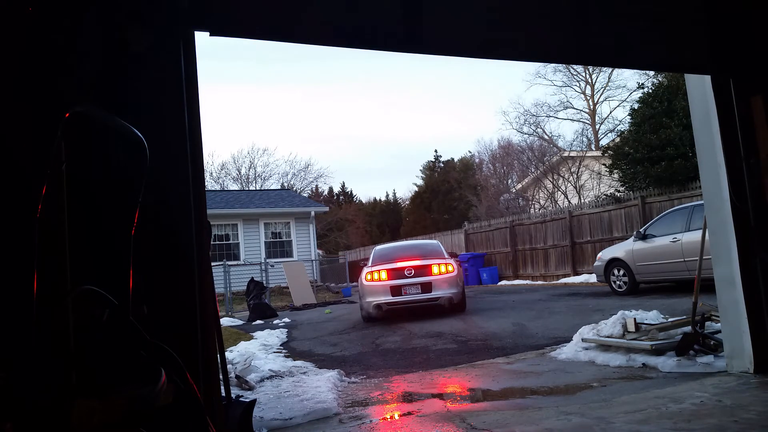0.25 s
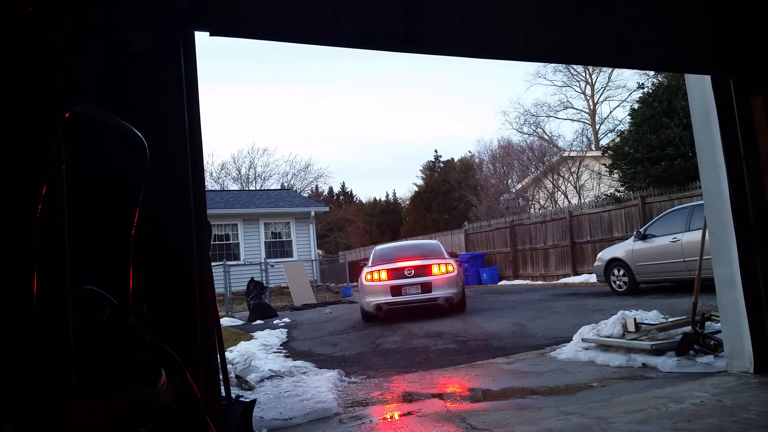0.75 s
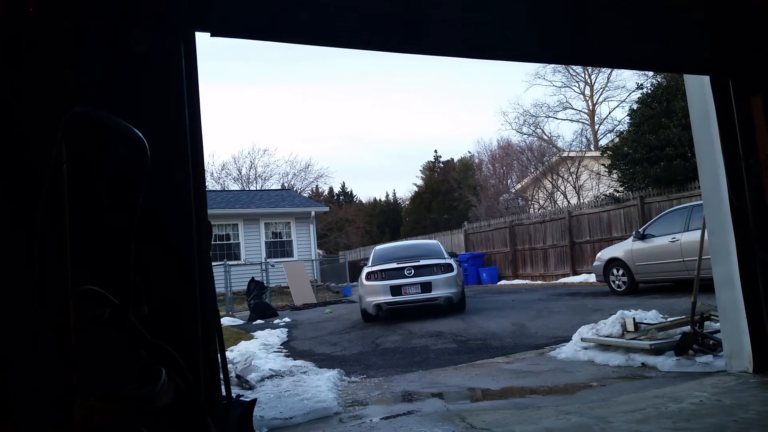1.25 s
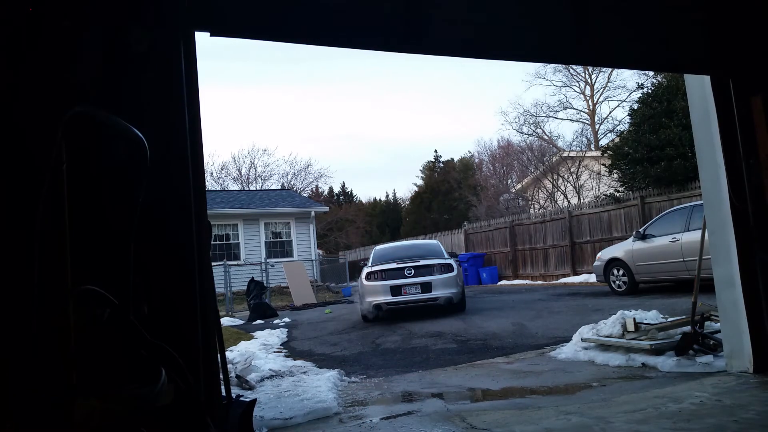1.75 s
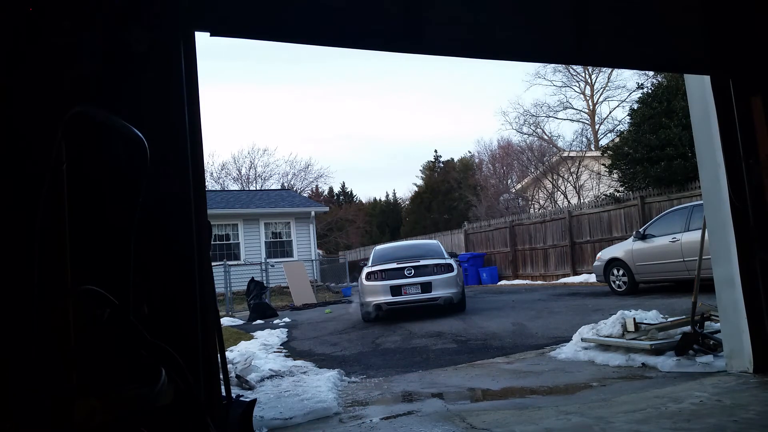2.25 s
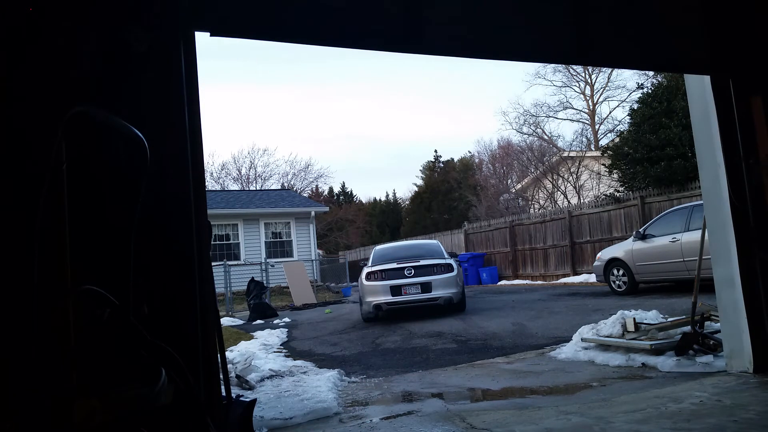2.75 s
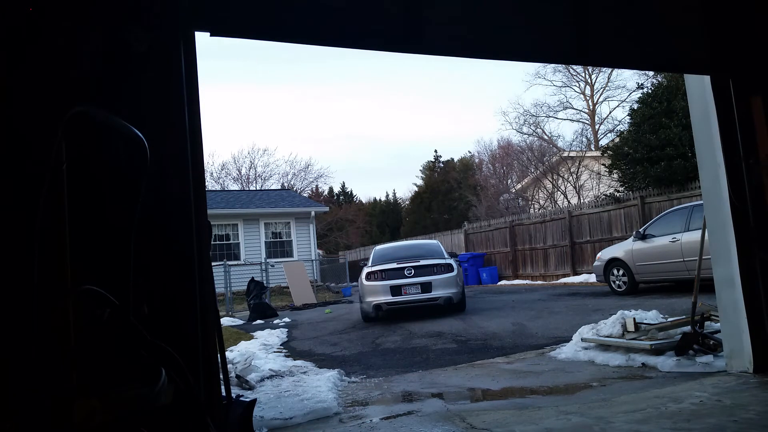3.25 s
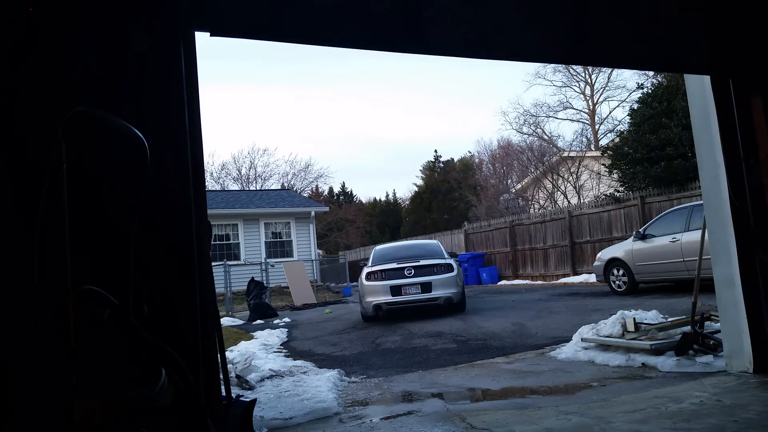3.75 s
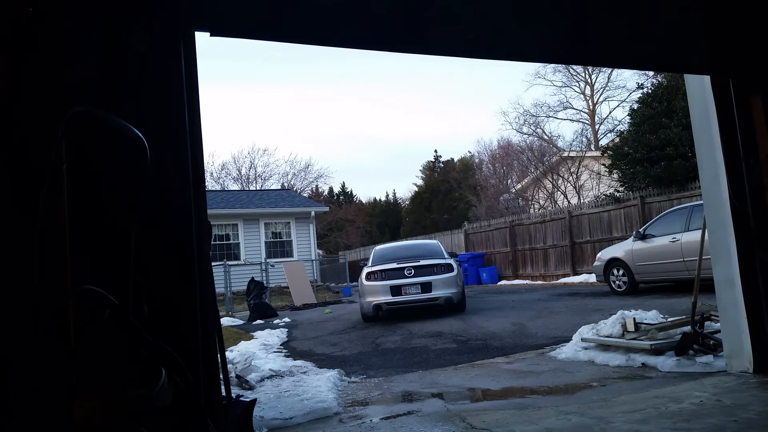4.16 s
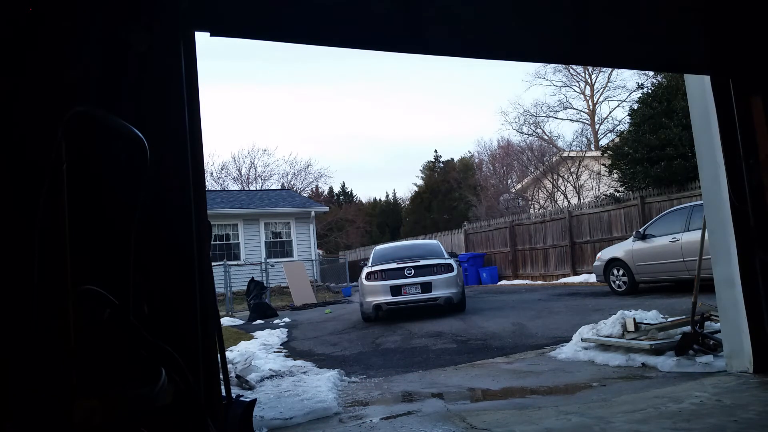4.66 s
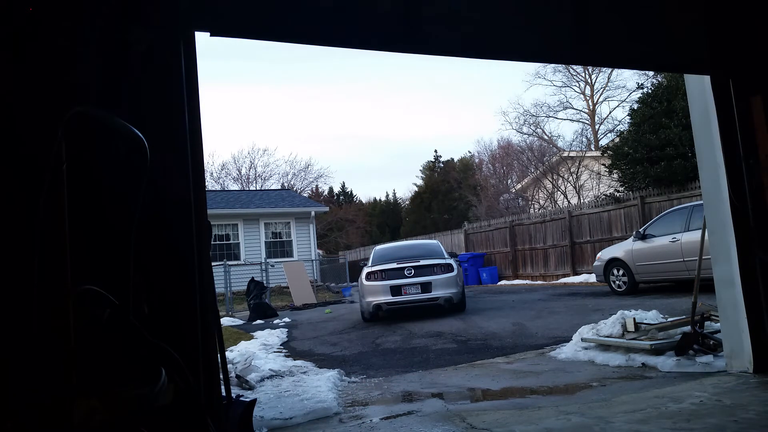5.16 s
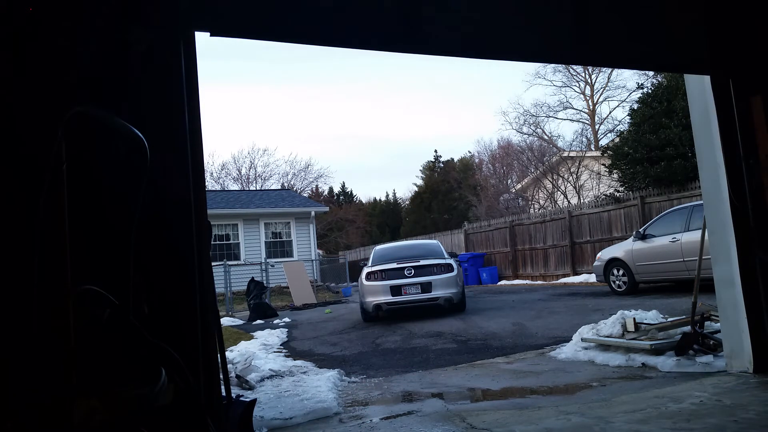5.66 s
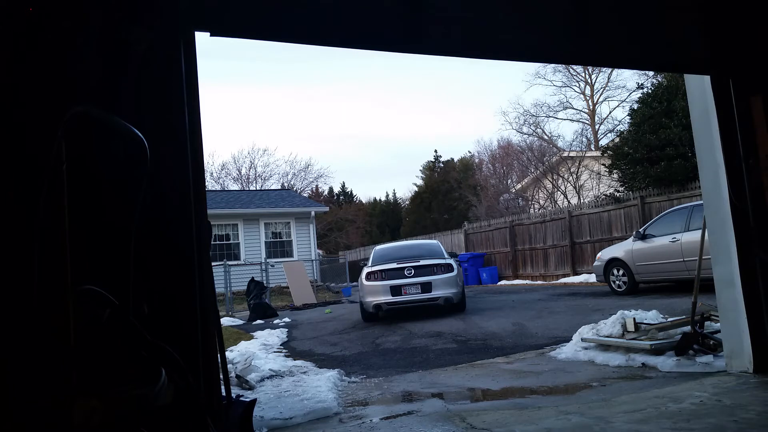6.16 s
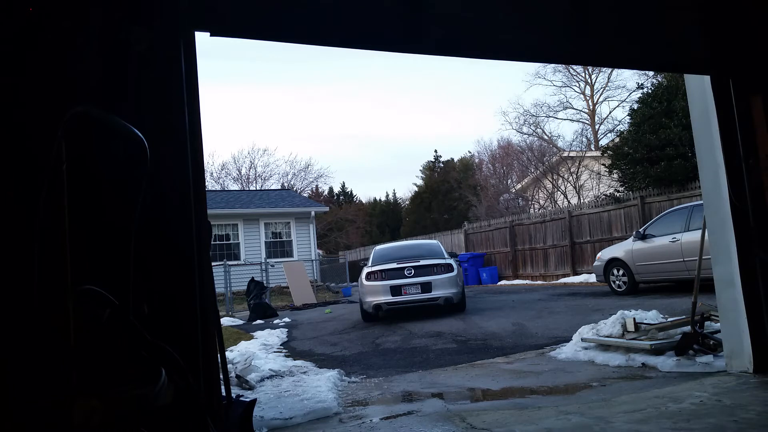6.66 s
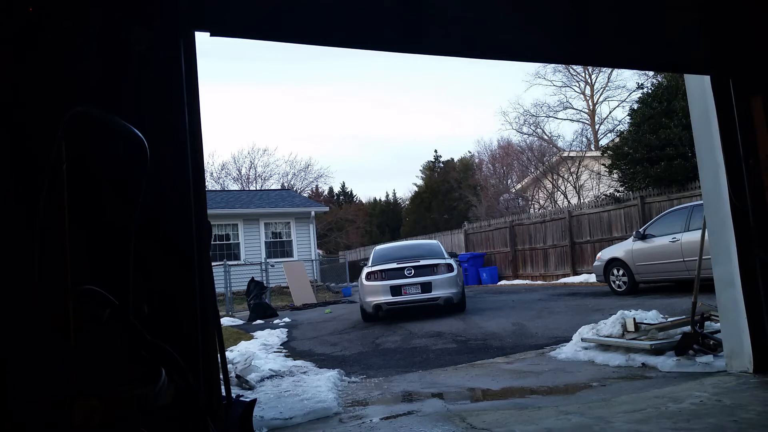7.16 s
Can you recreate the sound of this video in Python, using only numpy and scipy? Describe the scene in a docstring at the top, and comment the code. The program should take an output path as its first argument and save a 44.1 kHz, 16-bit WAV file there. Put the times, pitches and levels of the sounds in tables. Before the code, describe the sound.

A V8 car with a loud exhaust is already running in a driveway, heard from inside an open garage. From the start it labours at a raised idle, climbing slightly in pitch and swelling into a deep, booming drone that is loudest around 2 seconds. A wavering hum and a gassy rasp ride on it early. Between about 2.2 and 2.6 seconds the engine speed drops and it settles into a somewhat quieter, lumpy lope. This rumble continues until the end at about 7.4 seconds, with uneven chugs, small surges around 5 to 6 seconds and brief ragged barks near 6 and 7 seconds. The low pulses make the garage ring, and the tailpipes give a few soft spits. Underneath are faint engine ticking, scattered metallic clicks, most noticeable around 2 to 3 seconds, a light hiss and a barely audible pump whine.

```python
"""A driveway, heard from inside an open garage: a V8 with a loud exhaust is running.
It labours at a raised, booming idle, then drops to a lumpy lope after about two seconds.
Each firing thumps the tailpipes and puffs gas, ringing the pipes and the garage.
The engine ticks, clicks and hisses, and a pump whines faintly."""
import sys
import numpy as np
from scipy import signal
from scipy.fft import rfft, irfft
from scipy.io import wavfile
from scipy.ndimage import uniform_filter1d, minimum_filter1d

SR = 44100
rng = np.random.default_rng(int(sys.argv[2]) if len(sys.argv) > 2 else 0)


def to_wav(sig):
    """Store sig (one row per channel, or 1-D mono) as 16-bit WAV at the path in sys.argv[1].

    Samples outside -1..1 are clipped; the rate is SR.
    """
    pcm = np.clip(np.atleast_2d(sig), -1, 1) * 32767
    pcm = np.round(pcm).astype(np.int16)
    wavfile.write(sys.argv[1], SR, pcm.T)  # frames by channels


N = 326781
TIME = np.arange(N) / SR


# Engine speed. Each row: time in seconds, firings per second.
FIRING_RATE_HZ = [(0.0, 85.78), (0.58, 93.43), (1.55, 97.93), (2.18, 95.26), (2.6, 82.92), (3.15, 82.23),
                  (3.75, 84.04), (4.5, 84.25), (5.85, 83.38), (6.7, 85.03), (7.41, 85.22)]

def crankshaft(start_firings=.19):
    """Crank position, counted in firings."""
    return start_firings + np.cumsum(curve(FIRING_RATE_HZ)) / SR


# Cylinder strengths in firing order. Each row: gain pulling in dB, gain idling in dB.
CYLINDER_DB = [(7, -14), (2.4, 4.8), (0.5, 0.4), (-15, 4.6), (-1.4, 7), (0.9, 7.3), (3.1, -2.6), (1.2, 2.8)]
# Engine load. Each row: time in seconds, idling share 0-1, unevenness of the burns 0-1.
ENGINE_LOAD = [(0, 0.6, 0.12), (.35, 0.35, 0.13), (.6, 0.04, 0.22), (1.5, 0.03, .18), (2.15, 0.06, 0.22),
               (2.5, 1, 0.16), (3.4, 1, 0.16), (3.8, 1, 0.115)]

def firings(crank, carry=0.86, jitter_s=0.00035):
    """Sample and size of each pulse. Residual gas makes a cylinder's weak burn follow its strong one."""
    at = crossings(crank)
    cylinder = np.floor(crank[at]).astype(int) % len(CYLINDER_DB)
    pulling_db, idling_db = np.transpose(CYLINDER_DB)[:, cylinder]
    idling, uneven = curve(ENGINE_LOAD)[at], curve(ENGINE_LOAD, column=2)[at]
    burn, late = rng.standard_normal((len(at), 2)).T
    cycle_feedback = np.r_[1, np.zeros(len(CYLINDER_DB) - 1), carry]
    strength = 1 + np.tanh(uneven * signal.lfilter([1], cycle_feedback, burn))
    sizes = strength * gain_of((1 - idling) * pulling_db + idling * idling_db)
    return shifted(at, late * jitter_s), sizes


# Pipe response to one pulse. Each row: frequency in Hz, gain in dB.
PIPE_SPECTRUM = [(20, -38), (42, -21), (51, -23), (59, 4.5), (66, -9), (74, -9), (79, -14), (84, -6.8),
                 (89, -9.5), (96, 2.5), (101, 4), (107, 10), (111, 6.5), (116, 0), (126, 5.5), (134, -3.5),
                 (143, -2.5), (150, -12), (161, -11), (168, -24), (179, -17), (200, -35), (400, -60)]
# Boom level. Each row: time in seconds, level in dB.
BOOM_DB = [(0, -21.5), (.2, -17.5), (.65, -12.5), (1.2, -10), (2.13, -8.5), (2.3, -11.5), (2.52, -21.5),
           (2.8, -15.5), (3.1, -15.5), (3.85, -20), (7.4, -21.5)]
# Surges of harder burns as the idle hunts. Each row: centre in seconds, boom swell in dB.
IDLE_SURGES = [(2.79, 2.5), (3.46, 2), (4.06, 1.6), (4.33, 1.5), (4.55, 2), (4.92, 4), (5.3, 5.5),
               (5.64, 3.5), (5.87, 4), (6.24, 1.7), (7.03, 2), (7.28, 3.5)]
# Gaps and chugs from single weak or strong burns. Each row: centre in seconds, boom change in dB.
BURN_LURCHES = [(.3, -7), (2.26, -8), (2.53, 5.5), (2.7, -2), (2.9, -3.5), (2.99, 1), (3.07, 4), (3.1, -5),
                (3.28, -5), (3.58, 2), (3.81, -3.5), (4.19, -4.5), (4.39, -2.5), (4.77, -7), (4.88, 1),
                (5.01, 3), (5.15, -4.5), (5.34, -7.5), (5.56, 1), (5.75, -3), (6.25, 4), (6.61, -4.5),
                (6.77, -2.5), (6.86, -1.5), (7.34, -3)]

def boom(pulses):
    """The pulses ring the low resonances of pipes and mufflers."""
    pipes = steady(lowpass(colour(pulses, PIPE_SPECTRUM), hz=617), window=4200)
    level_db = curve(BOOM_DB) + swells(IDLE_SURGES) + swells(BURN_LURCHES, sigma_s=.015)
    return garage(pipes, wet_db=-22, t60_s=.3) * gain_of(level_db) * pan(left_db=-1.3)


# Blat spectrum. Each row: frequency in Hz, gain in dB.
BLAT_SPECTRUM = [(60, -42), (150, -1), (165, 0), (180, -5), (197, -7), (216, -8), (232, 1), (250, -1),
                 (272, 2), (295, -0.5), (312, 3), (345, 3.5), (368, -10), (400, -10.5), (438, -25),
                 (480, -21.5), (590, -22), (660, -30), (900, -55), (3000, -100)]
# Blat level. Each row: time in seconds, level in dB.
BLAT_DB = [(0, -37), (.35, -34), (1.0, -35), (2.3, -35.5), (2.6, -37.5), (7.4, -38.5)]
# Garage ringing. Each row: time in seconds, level relative to the direct blat in dB.
RINGING_DB = [(0, -7), (.5, -8), (1.0, 0), (2.3, 0), (3.0, 6)]
# Ragged burns barking in the pipes. Each row: centre in seconds, blat swell in dB, rasp swell in dB.
PIPE_BARKS = [(.02, 6, 1), (.3, 3.5, 0), (.49, 4.5, 0.5), (1.17, 4, -0.5), (2.22, 0.5, -1), (5.1, 0.5, -1),
              (6.0, 4.5, -0.5), (6.37, 1.5, 0.5), (6.57, 3.5, 1), (7.12, 7, 1.5), (7.38, 7.5, 1)]

def blat(at, sizes, scatter_s=0.00067, gas_gain=1.5, flow=1.0):
    """The ragged front of each pulse and its puff of gas bark in the low mids and ring the garage."""
    fronts = train(shifted(at, scatter_s * rng.standard_normal(len(at))), sizes)
    gas = (flow + puffs(fronts, rise_s=0.0051)) * turbulence(shared=0.81)
    drive = steady(fronts) + gas_gain * steady(gas)
    bark = steady(colour(drive, BLAT_SPECTRUM)) + gain_of(curve(RINGING_DB)) * garage_ringing(drive)
    level_db = curve(BLAT_DB) + 0.26 * swells(IDLE_SURGES) + swells(PIPE_BARKS)
    room = garage(bark, wet_db=-13, t60_s=0.19)
    return steady(room, window=5000) * gain_of(level_db) * pan(left_db=3.5)


# Pipe overtone, singing while the engine pulls. Each row: time in seconds, level in dB.
OVERTONE_DB = [(0, -28.5), (.12, -44.5), (.38, -32.5), (.75, -35.5), (1.0, -43), (1.5, -54), (2.2, -50.5),
               (2.6, -67.5)]

def overtone(multiple=2.5, resonance_hz=232, follow=.4, waver_db=2):
    """A clean, wavering overtone of the firings, held near a pipe resonance."""
    hz = resonance_hz + follow * (multiple * curve(FIRING_RATE_HZ) - resonance_hz)
    tone = np.sqrt(2) * np.sin(2 * np.pi * np.cumsum(hz) / SR)
    waver = steady(lowpass(rng.standard_normal(N), hz=2.3), window=40000)
    return tone * gain_of(curve(OVERTONE_DB) + waver_db * waver) * pan(left_db=2)


# Gas noise at the tailpipes. Each row: frequency in Hz, gain in dB.
GAS_SPECTRUM = [(250, -47.5), (450, -12), (640, -6.5), (720, 2.5), (830, 2.5), (980, -3.5), (1250, -6.5),
                (1550, -14), (1900, -17.5), (2300, -25), (6000, -74.5)]

def rasp(pulses, flow=7.3, idle_db=-52, idle_hz=84, db_per_hz=0.1925):
    """Gas leaves the tailpipes in puffs over a steady flow, louder with engine speed."""
    gas = (flow + puffs(pulses, rise_s=0.0018)) * turbulence(shared=.6)
    room = garage(colour(gas, GAS_SPECTRUM), wet_db=-5, t60_s=0.38)
    level_db = idle_db + db_per_hz * (curve(FIRING_RATE_HZ) - idle_hz) + swells(PIPE_BARKS, column=2)
    return steady(room) * gain_of(level_db) * pan(left_db=3)


# Tailpipe spits. Each row: start in seconds, level in dB before the boost.
GAS_SPITS = [(0.049, -46), (0.321, -44.5), (2.185, -47), (4.937, -50), (5.6, -46), (5.745, -50),
             (6.178, -51), (6.765, -51)]

def spits(rise_s=.002, boost_db=2):
    """A few sharp puffs of gas crack out above the rasp."""
    envelope = np.zeros(N)
    for start_s, db in GAS_SPITS:
        age = np.maximum(TIME - start_s, 0) / rise_s
        envelope += gain_of(db + boost_db) * age * np.exp(1 - age)
    return envelope * steady(colour(turbulence(shared=0.29), GAS_SPECTRUM)) * pan(left_db=1.5)


# Ticking level. Each row: time in seconds, level in dB.
TICK_DB = [(0, -70.5), (.65, -68), (1.0, -66.5), (1.15, -67.5), (2.0, -62), (2.6, -65), (3.05, -61),
           (3.7, -67), (6.0, -69), (6.8, -69.5)]

def tick_level_db():
    """The ticking rises with each surge."""
    return curve(TICK_DB) + 1.2 * swells(IDLE_SURGES)


def tick_bursts(ticks, spread_db=3, jitter_s=.0012):
    """Envelope of soft ticks, uneven in strength and timing."""
    size, late = rng.standard_normal((len(ticks), 2)).T
    return puffs(train(shifted(ticks, jitter_s * late), gain_of(spread_db * size)), rise_s=.003)


# Tick spectrum. Each row: frequency in Hz, gain in dB.
TICK_SPECTRUM = [(1500, -28), (3000, -11.5), (4500, -10), (5800, -12.5), (6500, -24.5), (7300, -16),
                 (8000, -4.5), (8900, -11), (9700, -5), (11200, 0.5), (12400, -4.5), (14500, -6.5)]

def ticking(ticks, sizzle=3.5):
    """Gritty ticks over a fine sizzle."""
    grains = (sizzle + tick_bursts(ticks)) * grit(shared=0.18, grain_db=0.5)
    return steady(colour(grains, TICK_SPECTRUM)) * gain_of(tick_level_db())


# Modes of the engine's metal. Each row: frequency in Hz, gain in dB, T60 in seconds.
METAL_MODES = [(2750, -2.5, 0.02), (2950, -2.5, 0.04), (3384, -1, 0.042), (4290, 1.5, 0.032),
               (4930, -6.5, 0.036), (5540, -7, 0.016), (7750, -12.5, .02), (11400, 0.5, .022)]

def metal_blows(starts_s, modes_db, rise_s=0.0011, detune_hz=45):
    """Each blow rings the metal's modes at its own levels, slightly detuned, and echoes in the garage."""
    t, blows = np.arange(SR // 30) / SR, np.zeros((2, N))
    hz, db, t60_s = np.transpose(METAL_MODES)[:, :, None]
    modes = gain_of(db - 60 * t / t60_s) * np.exp(2j * np.pi * hz * t) * (1 - np.exp(-t / rise_s))
    for start_s, levels_db in zip(starts_s, modes_db):
        weights = gain_of(levels_db) * np.exp(2j * np.pi * rng.random((2, len(METAL_MODES))))
        detune = np.exp(2j * np.pi * rng.normal(0, detune_hz) * t)
        add(blows, start_s, (weights @ modes * detune).real)
    return garage(blows, wet_db=-8, t60_s=.12)


def tick_rings(ticks, boost_db=2.5, spread_db=5, cap_db=7):
    """Each tick rings a different mix of the metal's modes."""
    chance_db = np.minimum(spread_db * rng.standard_normal((len(ticks), len(METAL_MODES))), cap_db)
    return metal_blows(ticks / SR, tick_level_db()[ticks, None] + boost_db + chance_db)


# Sharper metallic clicks. Each row: start in seconds, strength in dB, pitch in Hz.
ENGINE_CLICKS = [(0.563, -54.5, 3400), (0.945, -46, 3100), (1.277, -48, 3400), (1.503, -55.5, 4290),
                 (1.545, -50, 3315), (1.7102, -46, 3320), (1.9177, -46, 3360), (2.0, -49, 2960),
                 (2.0195, -45, 3000), (2.083, -50, 3800), (2.103, -48.5, 3830), (2.252, -48, 11000),
                 (2.7139, -44, 3300), (2.7384, -52, 2950), (2.883, -50, 4280), (2.955, -48, 11200),
                 (2.9823, -44, 4900), (3.078, -39, 11100), (3.127, -51, 11000), (3.392, -49, 11000),
                 (3.4152, -53.5, 3320), (3.439, -53, 4200), (3.844, -53, 3400), (4.368, -57, 3400),
                 (4.438, -52.5, 4300), (4.535, -48.5, 10900), (4.821, -52, 4200), (4.8673, -55, 2920),
                 (4.893, -51, 4200), (4.9392, -56.5, 4270), (5.2496, -51, 3420), (5.272, -47.5, 2870),
                 (5.321, -50, 3400), (5.583, -57, 4200), (5.895, -60, 4300), (6.229, -55.5, 3380),
                 (6.277, -53.5, 4200), (6.348, -51.5, 4200), (6.727, -54.5, 3400)]

def clicks(falloff_db_per_octave=14):
    """Each click rings mostly the metal's modes near its own pitch."""
    starts_s, db, hz = np.transpose(ENGINE_CLICKS)
    octaves_off = abs(np.log2(np.array(METAL_MODES)[:, 0] / hz[:, None]))
    return metal_blows(starts_s, db[:, None] - falloff_db_per_octave * octaves_off)


# Engine hiss. Each row: frequency in Hz, gain in dB.
HISS_SPECTRUM = [(1300, -37.5), (2250, -9), (2800, -1), (3500, -2.5), (3900, -2), (4350, -1.5),
                 (5000, -9.5), (5700, -22), (6400, -27.5), (9000, -35.5)]

def hiss(ticks, flow=7, mean_db=-63.5, follow=0.75):
    """Belts, chains and intake hiss, beating lightly with the ticks and following their level."""
    rush = (flow + tick_bursts(ticks)) * grit(shared=0.22, grain_db=1.5)
    tick_db = tick_level_db()
    return steady(colour(rush, HISS_SPECTRUM)) * gain_of(mean_db + follow * (tick_db - tick_db.mean()))


def pump_whine(hz=1932, sigma_hz=20, level_db=-72):
    """A faint pump whine: a narrow, wavering band of noise."""
    band = np.exp(-.5 * ((np.fft.rfftfreq(N, 1 / SR) - hz) / sigma_hz) ** 2)
    whine = irfft(rfft(turbulence(shared=0.051)) * band, N)
    return gain_of(level_db) * steady(whine, window=40000)


# Garage resonances. Each row: frequency in Hz, bandwidth in Hz, relative gain in dB.
ROOM_MODES = [(179, 6, 12.5), (210, 6, -5), (232, 6, 8), (254, 7, -5), (270, 9, 2.5), (297, 8, -2),
              (311, 9, 0.5), (338, 22, -2), (454, 6, -16), (486, 18, -22), (548, 30, -24)]
# Exhaust band that reaches them. Each row: frequency in Hz, gain in dB.
ROOM_DRIVE_SPECTRUM = [(120, -25), (170, 0), (570, 0), (900, -40)]

def garage_ringing(drive):
    """The exhaust excites the garage's decaying modes; unit rms."""
    t = np.arange(SR // 2) / SR
    ring = sum(gain_of(db) * width_hz * np.exp(-np.pi * width_hz * t) * np.cos(2 * np.pi * hz * t)
               for hz, width_hz, db in ROOM_MODES)
    return steady(convolve(colour(drive, ROOM_DRIVE_SPECTRUM), ring))


def garage(x, wet_db, t60_s, gap_s=.003):
    """Direct sound plus wall reflections that differ at each microphone."""
    t = np.arange(SR // 2) / SR
    reflections = rng.standard_normal((2, len(t))) * gain_of(-60 * t / t60_s) * (t > gap_s)
    reflections /= np.linalg.norm(reflections, axis=1, keepdims=True)
    return x + gain_of(wet_db) * convolve(x, reflections)


def turbulence(shared):
    """Stereo white noise with a share of its power common to both sides."""
    noise = rng.standard_normal((3, N))
    return np.sqrt(shared) * noise[0] + np.sqrt(1 - shared) * noise[1:]


def grit(shared, grain_db):
    """Noise broken into fine grains."""
    noise = turbulence(shared)
    grains = steady(uniform_filter1d(rng.standard_normal(N), size=20))
    return noise * gain_of(grain_db * grains)


def crossings(count):
    """Samples at which a count passes a whole number."""
    return np.flatnonzero(np.diff(np.floor(count))) + 1


def shifted(at, delay_s):
    """Sample numbers moved by a delay."""
    return np.clip(at + (delay_s * SR).astype(int), 0, N - 1)


def train(at, sizes):
    """Single-sample pulses of the given sizes."""
    return np.bincount(at, sizes, N)


def puffs(pulses, rise_s):
    """Envelope of mean 1 that swells and dies after each pulse."""
    age = np.arange(SR // 10) / SR / rise_s
    envelope = signal.fftconvolve(pulses, age * np.exp(-age))[:N]
    return envelope / envelope.mean()


def swells(rows, sigma_s=.05, column=1):
    """Sum of short Gaussian swells, in dB."""
    return sum(row[column] * np.exp(-.5 * ((TIME - row[0]) / sigma_s) ** 2) for row in rows)


def curve(rows, column=1):
    """One column of a time table, interpolated at every sample."""
    rows = np.asarray(rows)
    return np.interp(TIME, rows[:, 0], rows[:, column])


def gain_of(db):
    """Decibels to a factor."""
    return 10 ** (np.asarray(db) / 20)


def pan(left_db):
    """Channel gains for a left-over-right level."""
    return gain_of([[left_db / 2], [-left_db / 2]])


def steady(x, window=8000):
    """Scales to a running rms of 1, keeping the fast throb; window in samples."""
    power = np.mean(np.atleast_2d(x) ** 2, axis=0)
    return x / np.sqrt(uniform_filter1d(uniform_filter1d(power, window), window) + 1e-20)


def colour(x, spectrum, size=16384):
    """Minimum-phase filter: the spectrum's peaks ring on after each pulse."""
    hz, db = np.transpose(spectrum)
    bins_hz = abs(np.fft.fftfreq(size, 1 / SR)) + 1
    log_gain = np.interp(np.log(bins_hz), np.log(hz), np.log(gain_of(db)))
    ring = np.fft.ifft(np.exp(signal.hilbert(log_gain).conj())).real
    return convolve(x, ring[:size // 2])


def convolve(x, response):
    """Applies an impulse response per channel."""
    return signal.fftconvolve(np.atleast_2d(x), np.atleast_2d(response), axes=1)[:, :N]


def lowpass(x, hz):
    """Fourth-order low-pass."""
    return signal.sosfilt(signal.butter(4, hz, fs=SR, output="sos"), x)


def add(mix, start_s, sound):
    """Mixes a sound in place."""
    part = mix[:, round(start_s * SR):][:, :sound.shape[1]]
    part += sound[:, :part.shape[1]]


def limiter(x, ceiling_db=-6.5, grip=0.55, window=700):
    """Takes back a share of the level by which peaks pass the ceiling."""
    allowed = np.minimum(1, gain_of(ceiling_db) / (abs(x).max(axis=0) + 1e-9)) ** grip
    return x * uniform_filter1d(minimum_filter1d(allowed, window), window)


def scene():
    """One crankshaft times the exhaust pulses and the ticks."""
    crank = crankshaft()
    at, sizes = firings(crank)
    pulses = train(at, sizes)
    ticks = crossings(crank / 2 - .285)  # trailing every second firing
    exhaust = boom(pulses) + blat(at, sizes) + overtone() + rasp(pulses) + spits()
    engine = hiss(ticks) + ticking(ticks) + tick_rings(ticks) + clicks()
    return exhaust + engine + pump_whine()


def record(dry, low_hz=30, high_hz=14550):
    """The microphone sheds the deepest bass, a limiter holds the boom, a low-pass cuts the top."""
    thinned = signal.sosfilt(signal.butter(2, low_hz, "high", fs=SR, output="sos"), dry)
    band_limit = signal.firwin(511, high_hz, window=("kaiser", 9), fs=SR)
    return signal.oaconvolve(limiter(thinned), band_limit[None], "same")


dry = scene()
out = record(dry)
to_wav(out)
```